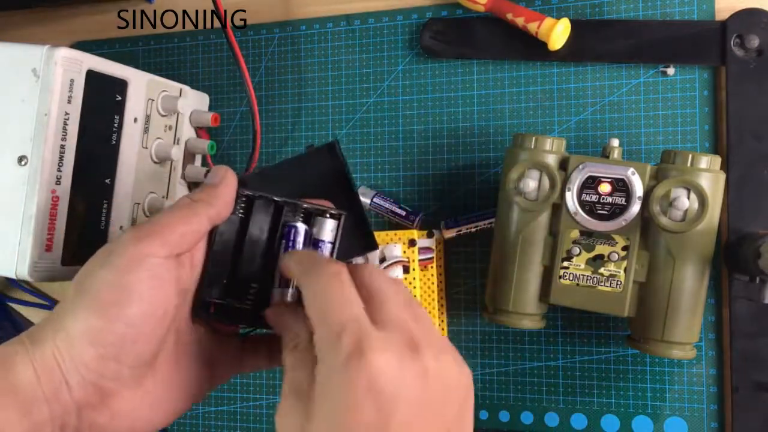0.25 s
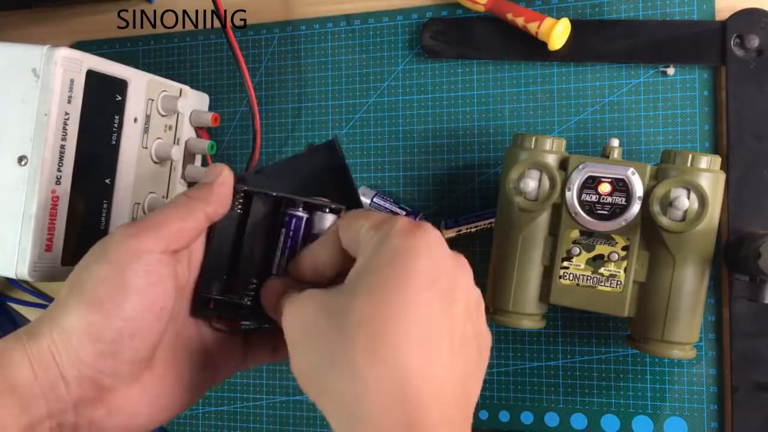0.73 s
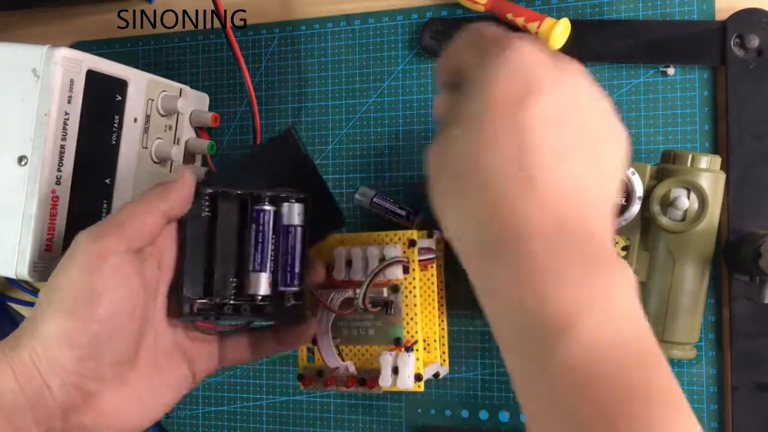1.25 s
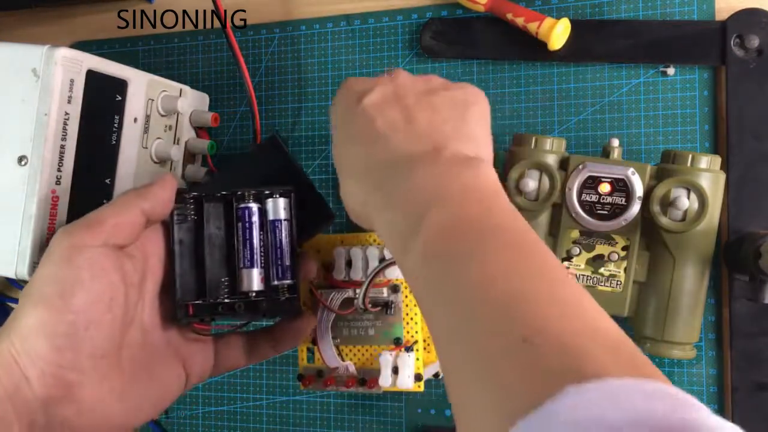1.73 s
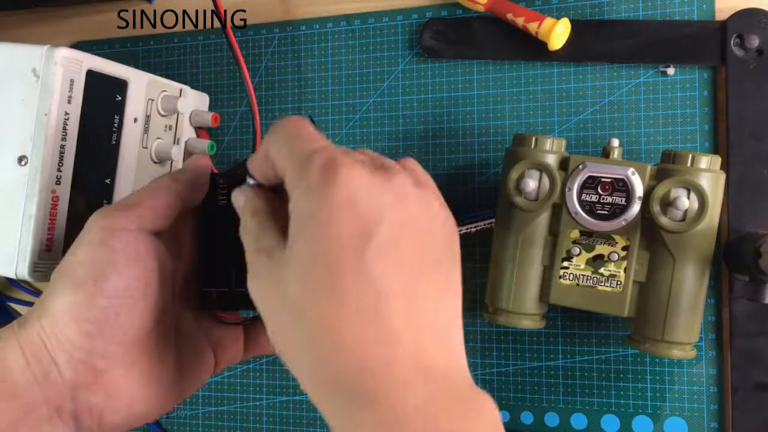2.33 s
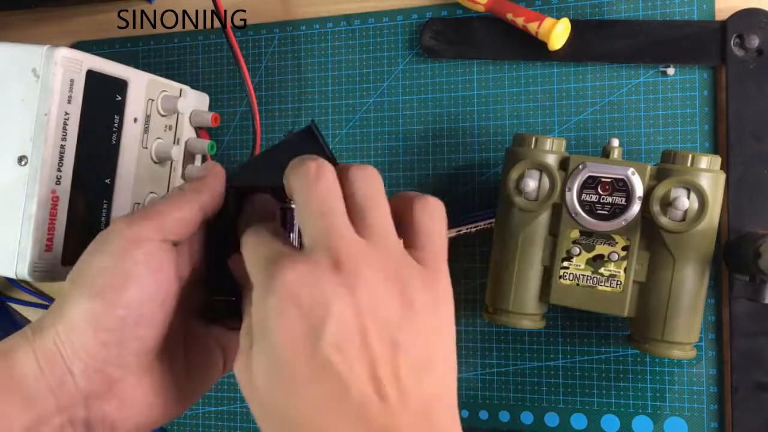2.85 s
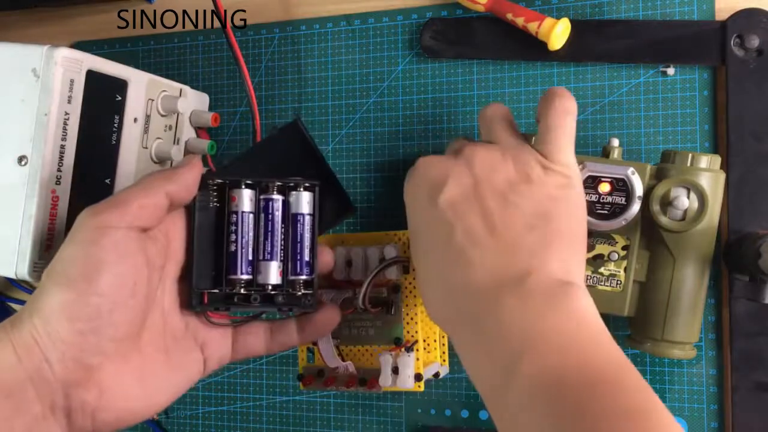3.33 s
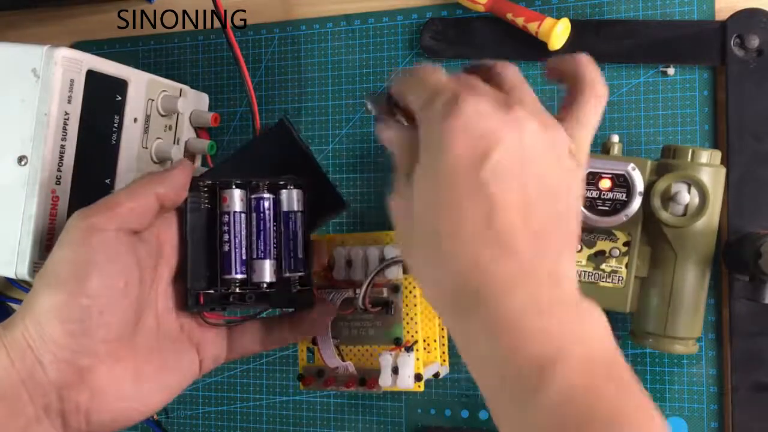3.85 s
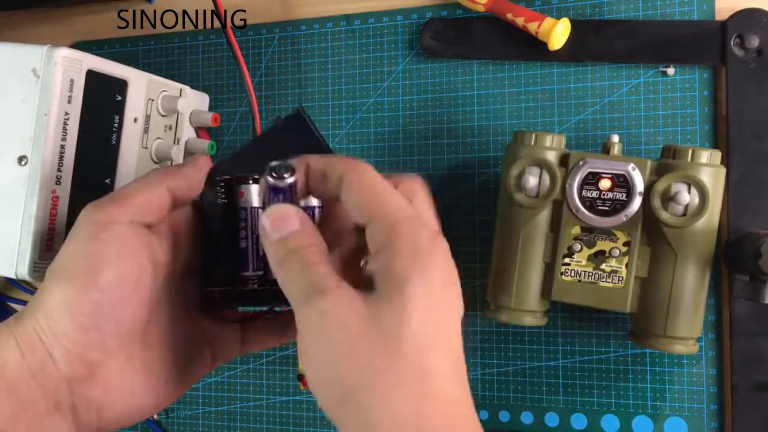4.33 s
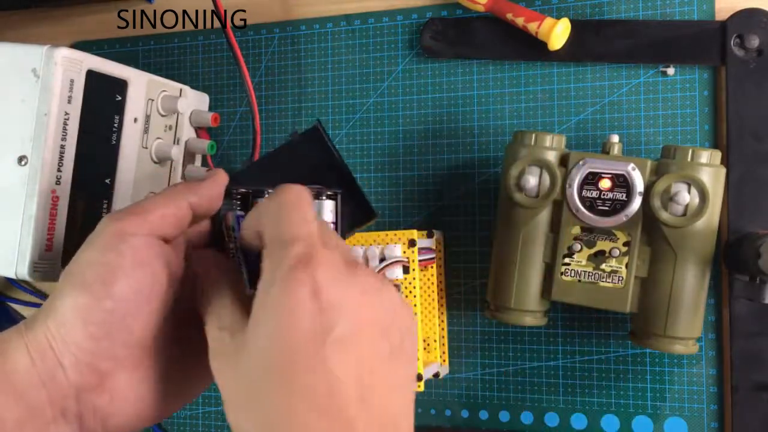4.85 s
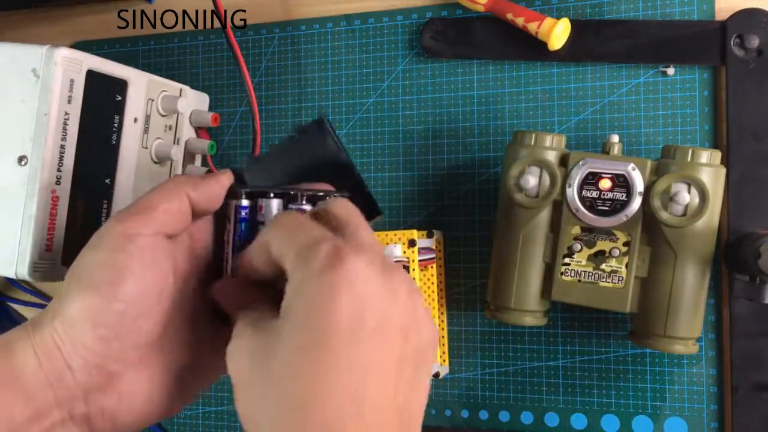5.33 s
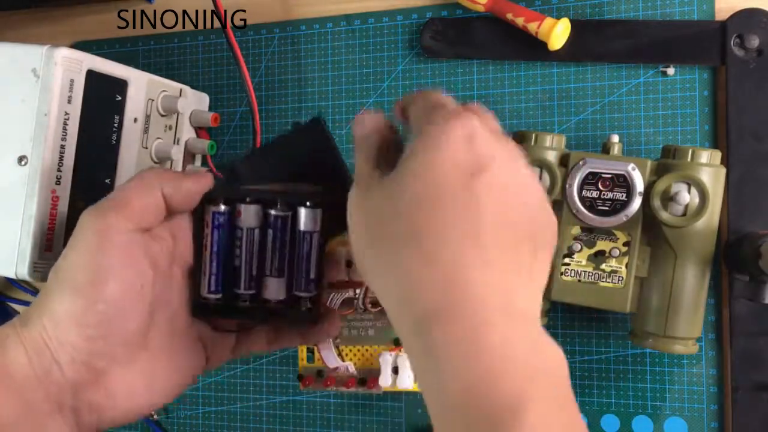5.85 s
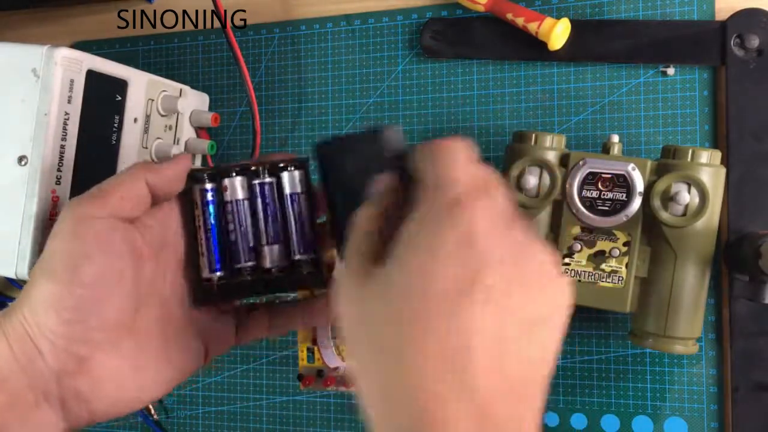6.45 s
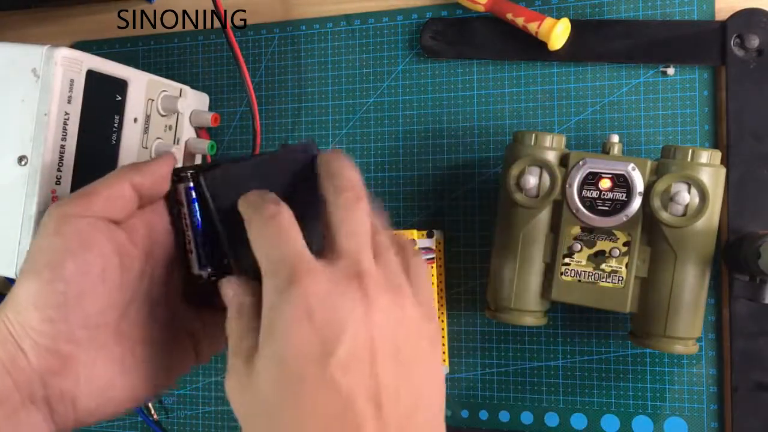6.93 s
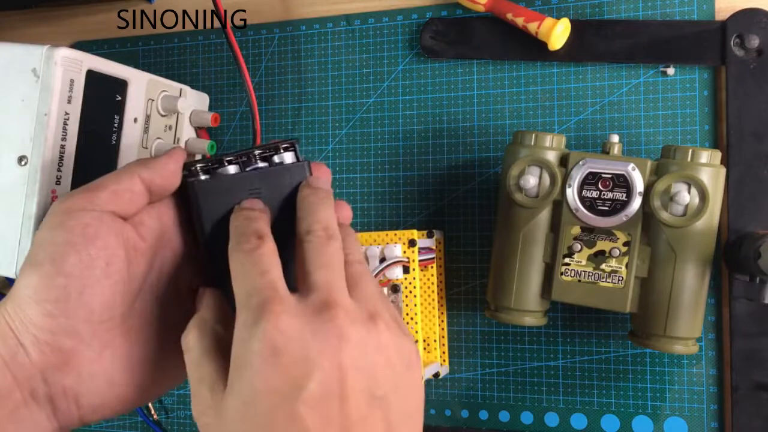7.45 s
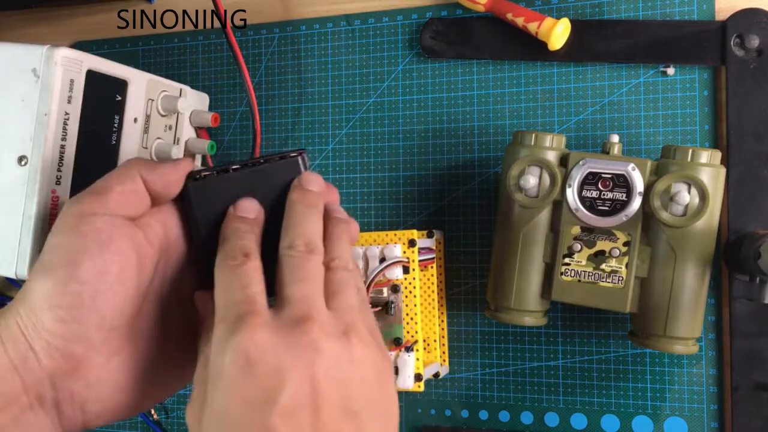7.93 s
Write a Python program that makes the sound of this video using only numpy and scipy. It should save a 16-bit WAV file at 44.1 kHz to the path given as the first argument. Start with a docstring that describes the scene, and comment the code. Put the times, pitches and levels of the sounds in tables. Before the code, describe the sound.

Small battery cells tick, scrape and snap into a hard plastic holder over a low room hum, then a thin lid slides shut.

```python
"""Close microphone over a workbench in a small room with a low hum; faint double chirps recur throughout.
First, cells tick, scrape and snap into a plastic holder, a contact spring sings and the bench is bumped.
More cells go in, a hand bumps the bench while fetching the last, and that one is pressed home.
Finally the lid is picked up, laid on and slid shut. Contacts are small forces ringing each part's modes,
the spring is a set of fluttering tones, and the background is wavering tones and filtered noise."""
import sys
import numpy as np
from scipy import signal
from scipy.fft import rfft, irfft
from scipy.io import wavfile

SR = 44100
rng = np.random.default_rng(int(sys.argv[2]) if len(sys.argv) > 2 else 0)


def wav_record(signal):
    """Record a signal, one row per channel, as 16-bit PCM in the file named by sys.argv[1]."""
    frames = np.transpose(np.atleast_2d(signal))
    bounded = np.clip(frames, -1, 1)
    # unit amplitude maps onto the largest positive 16-bit level
    quanta = np.round(bounded * 32767).astype(np.int16)
    wavfile.write(sys.argv[1], SR, quanta)


N = 361179

# Cells touching the holder, levels before colour and mix: [start_s, drag_s, favoured_hz, level_db, weight_db, hardness_db]
CELL_CONTACTS = [(.0088, 0, 2600, -29.5, -1, -4.5), (.015, 0.03, 2380, -42, 3, 1),
                 (.024, 0.014, 2120, -29, 2.5, -7), (.044, .017, 2880, -36, -5, 2),
                 (.163, .002, 2090, -41, 4, 4), (.1965, 0.0046, 2580, -29.5, 2.5, -2.5),
                 (.3596, 0.002, 2430, -34, 11.5, 15), (.4344, 0.0015, 1830, -27.5, -0.5, -7),
                 (.4653, 0.0028, 2820, -33, 11, 18.5), (.9567, 0, 2630, -62.5, 5, 26.5),
                 (2.3456, 0.0078, 2460, -43, -9, 6), (2.3715, 0.00027, 2570, -28.5, -1, -5),
                 (2.4284, 0.0018, 2160, -33.5, 0, -4), (2.4673, 0.0042, 2150, -24.5, 3, -3.5),
                 (2.4937, 0.00067, 2050, -24.5, -1.5, -16), (2.6204, 0.0029, 2070, -51, -4, 12),
                 (2.714, 0.021, 2060, -43.5, 4.5, -8), (2.805, 0.0068, 2116, -44.5, 6, 13),
                 (2.8162, .01, 2100, -25.5, -2.5, -1.5), (2.8267, .001, 2150, -12, 1, 6.5),
                 (2.8335, 0.0045, 2160, -26.5, -5.5, 4), (3.0008, 0, 2040, -43.5, -9, -4),
                 (3.042, 0.0017, 2440, -35, -10, 3.5), (4.799, 0.011, 2550, -44, -9, 9),
                 (4.8798, 0.0023, 2670, -38, 1, 3.5), (5.1748, 0, 2510, -18, -1.5, 3),
                 (5.2794, 0.00082, 2050, -23, 8, 6), (5.2882, 0.0068, 1900, -20.5, 1.5, -2),
                 (5.3066, 0.00098, 2040, -17, 5, 1), (5.321, 0.0066, 2040, -31, 5, 7)]
# The lid picked up, laid on and slid home: [start_s, drag_s, favoured_hz, level_db, weight_db, hardness_db]
LID_CONTACTS = [(5.9655, 0.0041, 2850, -36, 6, 1), (6.186, .007, 2460, -51, 9, 13),
                (6.4986, 0.0032, 1960, -38.5, 4.5, 6.5), (6.5809, 0.0061, 2190, -47, 11, -8),
                (6.595, 0.072, 2340, -55.5, 10, 1), (6.7128, 0.0027, 2400, -31, 4, 2),
                (6.7172, 0.007, 2600, -22, -5.5, 0), (6.738, 0.0097, 2350, -42, 1, 10.5),
                (7.08, 0.08, 2800, -56, 4, 1), (7.2614, 0.0015, 2170, -43.5, 1, -3),
                (7.2908, 0.0017, 2670, -36.5, 0, 3.5), (7.48, 0.018, 2210, -46, 1.5, 1.5),
                (7.5083, 0.0022, 2370, -28, -1.5, 3.5), (7.524, 0.017, 2340, -38, 2, 1.5),
                (7.7, 0.054, 2150, -50.5, 2.5, -7), (7.8605, 0, 2100, -31, -9, -2)]
# Registers of a contact, thud to tick: [low_hz, high_hz]
REGISTERS = [(280, 750), (750, 1380), (1620, 3200), (3100, 5900), (7600, 15800)]
# What one dB of weight adds to each register, thud to tick: [lift_db_per_db]
WEIGHT_LIFTS = [1.05, .95, 0, 0, 0]
# What one dB of hardness adds to each register, thud to tick: [lift_db_per_db]
HARDNESS_LIFTS = [0, 0, 0, .65, 1.05]
# An average holder contact, relative level in each register, thud to tick: [level_db]
HOLDER_COLOUR = [-17.5, -12.5, -0.5, -10, -20.5]
# An average lid contact, relative level in each register, thud to tick: [level_db]
LID_COLOUR = [-13.5, -6, 0, -4.5, -19]
# Modes of the loaded holder, before favouring: [pitch_hz, level_db, t60_s]
HOLDER_MODES = [(430, -29, .016), (645, -5.5, 0.047), (860, -2.5, 0.0066), (1086, 5, 0.018),
                (1176, -22.5, 0.0083), (1813, -6, 0.0195), (1961, 1, 0.025), (2116, -5, 0.039),
                (2318, -5.5, 0.04), (2650, -7, 0.022), (2850, 9.5, 0.0055), (3220, -10.5, 0.051),
                (3704, 5.5, 0.0135), (4070, 7.5, 0.0065), (4500, 1, 0.016), (5480, -3.5, 0.02),
                (6630, -13.5, 0.0051), (9000, -4, 0.019), (9340, -4, .01), (11220, -7.5, 0.018),
                (13850, -32, .008)]
# Lingering tones of the holder: [pitch_hz, level_db, t60_s]
HOLDER_RING = [(1885, -33.5, .2), (2060, -37, .22), (2250, -19, 0.36), (2380, -31.5, 0.18)]
# Modes of the thin lid, before favouring: [pitch_hz, level_db, t60_s]
LID_MODES = [(620, -22, .022), (880, -9, 0.014), (1046, -1, 0.03), (1140, -2, 0.012), (1670, -11, .014),
             (1830, -8, .014), (1970, -6, .018), (2150, -3, .018), (2325, -1, 0.013), (2620, -1.5, .018),
             (2895, -2.5, 0.014), (3600, -1, 0.011), (4020, -1, 0.0087), (5300, -13, .012),
             (9450, -8, 0.013)]
# Stereo spread of a contact, before the spread gain; widest for loud ticks: [tick_db, spread_db]
STEREO_SPREAD = [(-72, -33.5), (-53.5, -20.5), (-32, -2.5)]
# Fingers working the parts into place: [start_s, end_s]
FUMBLING = [(.1, .15), (0.479, .55), (2.501, 2.8), (4.81, 4.86), (5.19, 5.26), (5.56, 5.62), (6.02, 6.06),
            (7.6, 7.7)]
# Contact spring let go: [start_s, level_db]
SPRING_PLUCKS = [(.009, -52), (0.198, -55.5), (0.464, -59.5), (.6, -59.5)]
# Paired bending modes of the coil: [pitch_hz, level_db, t60_s]
SPRING_MODES = [(2299, 1, 0.87), (2360, -2.5, 1.24), (2800, -1, 1.3), (2848, -4.5, 1.1), (3230, -5, 1.4),
                (3280, -4, 1.2), (3730, -5, 0.42), (4300, -9, 0.3)]
# Soft bumps on the bench: [start_s, thump_db, rattle_db]
BUMPS = [(.778, -40, -66), (0.815, -43.5, -77), (3.452, -38, -48), (3.647, -33.5, -42), (3.742, -48, -50),
         (3.818, -30, -37.5)]
# Modes of the bench top: [pitch_hz, level_db, t60_s]
BENCH_MODES = [(92.6, 0, 0.44), (121, -10, 0.17), (215, -3, 0.092), (243.4, -2.5, 0.08), (343, -1.5, 0.046)]
# Modes of the loose things lying on the bench: [pitch_hz, level_db, t60_s]
RATTLE_MODES = [(605, -2.5, 0.051), (963, -1, 0.059), (1172, 2.5, 0.062), (1385, -8.5, 0.068),
                (1643, -4, 0.1), (1895, -1.5, 0.038), (2184, -6, 0.019)]
# Reflections off nearby surfaces: [delay_s, level_db]
ECHOES = [(.0023, -24), (.0068, -17.5), (0.0123, -23.5)]
# Diffuse room tail, gains before band filtering: [pitch_hz, level_db, t60_s]
ROOM = [(247, -15.5, 0.19), (1000, -14.5, 0.31), (2185, -12.5, 0.27), (4500, -12.5, 0.27),
        (9000, -5.5, 0.13), (14940, -15.5, .25)]
# Room hum, rms levels and the share of the tone that wanders: [pitch_hz, level_db, waver_0_to_1]
HUM = [(30.6, -57.5, .9), (69.2, -48, 0.99), (84, -55.5, .25), (100.3, -61, 0.91), (124, -60.5, 0.37)]
# Spectrum shape of the room air, relative: [pitch_hz, level_db]
AIR = [(59, -26), (100, -0.5), (156, -2), (260, -4.5), (302, -7), (335, -5.5), (415, -11.5), (608, -9),
       (705, -12.5), (1390, -14), (4980, -32.5), (7450, -35), (10700, -44.5), (14100, -46), (16000, -54)]
# Faint high double chirps: [start_s]
CHIRPS = [.16, 1.185, 1.955, 2.61, 3.715, 4.515, 5.4, 6.375, 7.535]

AIR_DB = -53  # rms
CUTOFF_HZ = 16000
# After each contact the part rebounds and rubs to rest, much weaker
REBOUND_S, REBOUND_DRAG_S, REBOUND_DB = .012, .0095, -28
# Faint touches while the fingers work; the rate is rounded to whole touches, at least one per spell
TOUCHES_PER_S, TOUCH_DRAG_S, TOUCH_HZ, TOUCH_DB, TOUCH_SPREAD_DB = 11, .026, 2310, -53, 1.5


def from_db(db):
    """Decibels to gain."""
    return 10 ** (np.asarray(db) / 20)


def rms(x):
    """Root mean square."""
    return np.sqrt(np.mean(np.abs(x) ** 2) + 1e-24)


def seconds(length):
    """A time axis of the given length in seconds."""
    return np.arange(int(length * SR)) / SR


def fade(t, t60):
    """Exponential decay, 60 dB down at t60."""
    return np.exp(-np.log(1000) * t / t60)


def band(x, low, high, order=2):
    """Causal band-pass."""
    sos = signal.butter(order, [low, min(high, .48 * SR)], "band", fs=SR, output="sos")
    return signal.sosfilt(sos, x)


def add(out, start_s, sound):
    """Mix a sound in from start_s."""
    at = max(int(start_s * SR), 0)
    out[at:at + len(sound)] += sound[:N - at]


def struck(modes, t, vary_db):
    """Decaying sines; each blow lands elsewhere and so weighs them differently."""
    hz, db, t60 = np.array(modes).T[:, :, None]
    polarity = rng.choice([-1, 1], hz.shape)
    weight = from_db(db + vary_db * rng.standard_normal(hz.shape)) * polarity
    return np.sum(weight * np.sin(2 * np.pi * hz * t) * fade(t, t60), axis=0)


def contacts(table, colour, modes, lingering, snap_db, crack_db, crack_t60, crack_hz,
             vary_db, slips_per_s, slip_db, favour_db, favour_octaves):
    """Each contact force drives a snap, a brief crack and the part's modes, levelled by register.
    Returns the sound and a copy scaled for stereo spread."""
    out, for_spread, t = np.zeros(N), np.zeros(N), seconds(.22)
    hz, mode_db, t60 = np.transpose(modes)
    dull = signal.butter(1, min(crack_hz, .45 * SR), fs=SR, output="sos")
    for start_s, drag_s, favoured_hz, level_db, weight_db, hardness_db in table:
        levels = register_levels(colour, level_db, weight_db, hardness_db)
        spread_db = np.interp(levels[-1], *np.transpose(STEREO_SPREAD))

        # the point of contact favours the modes around one pitch
        octaves_away = np.log2(hz / favoured_hz)
        favour = favour_db * np.exp(-(octaves_away / favour_octaves) ** 2)
        body = struck(np.transpose([hz, mode_db + favour, t60]), t, vary_db)
        crack = from_db(crack_db) * rng.standard_normal(len(t)) * fade(t, crack_t60)
        crack[0] += from_db(snap_db)  # the sudden stop of the part radiates one sharp pulse
        body += signal.sosfilt(dull, crack)
        if lingering:
            body += struck(lingering, t, vary_db)

        first = contact_force(drag_s, slips_per_s, slip_db)
        rebound = contact_force(REBOUND_DRAG_S, slips_per_s, slip_db)
        sound = signal.fftconvolve(body, with_rebound(first, rebound))[:len(t)]

        # each register is levelled over the drag and a few milliseconds more
        attack = int((max(drag_s, 0) + .0065) * SR)
        hit = np.zeros(len(t))
        for db, (low, high) in zip(levels, REGISTERS):
            part = band(sound, low, high, order=3)
            hit += from_db(db) * part / rms(part[:attack])
        add(out, start_s, hit)
        add(for_spread, start_s, from_db(spread_db) * hit)
    return out, for_spread


def register_levels(colour, db, weight_db, hardness_db):
    """Weight behind a contact fills its low registers, a hard edge its high ones."""
    weight = weight_db * np.array(WEIGHT_LIFTS)
    hardness = hardness_db * np.array(HARDNESS_LIFTS)
    return db + np.array(colour) + weight + hardness


def contact_force(drag_s, slips_per_s, slip_db, uneven_db=2.5):
    """A first touch, then tiny slips of uneven size that die out as the drag ends."""
    t = seconds(.1)
    polarity = rng.choice([-1, 1], len(t))
    sizes = from_db(slip_db + uneven_db * rng.standard_normal(len(t))) * polarity
    slips = (rng.random(len(t)) < slips_per_s / SR) * sizes
    # full for three quarters of the drag, gone a quarter after it
    force = slips * np.clip(2 * (1 - t / max(drag_s, 1e-5)) + .5, 0, 1)
    force[0] = 1
    return force


def with_rebound(first, rebound):
    """The force of a contact, followed by that of its weaker rebound."""
    late = np.pad(rebound, (int(REBOUND_S * SR), 0))[:len(first)]
    return first + from_db(REBOUND_DB) * late


def faint_touches():
    """Light rubs of average weight and hardness, at uneven moments while the fingers work."""
    touches = []
    for start, end in FUMBLING:
        count = max(round((end - start) * TOUCHES_PER_S), 1)
        edges = np.linspace(start, end, count + 1)
        for early, late in zip(edges, edges[1:]):
            start_s = rng.uniform(early, late)
            level_db = TOUCH_DB + TOUCH_SPREAD_DB * rng.standard_normal()
            touches.append((start_s, TOUCH_DRAG_S, TOUCH_HZ, level_db, 0, 0))
    return touches


def spring(flutter_db, flutter_per_s):
    """The coil sings on after a cell slips past it, fluttering as it chafes against the cell."""
    out, t = np.zeros(N), seconds(1.5)
    for start_s, level_db in SPRING_PLUCKS:
        for mode in SPRING_MODES:
            knots = rng.standard_normal(size=200)
            wander = np.interp(t * flutter_per_s, np.arange(len(knots)), knots)
            tone = from_db(flutter_db * wander) * struck([mode], t, vary_db=.5)
            add(out, start_s, from_db(level_db) * tone)
    return out


def bench(grit_db, grit_t60, thud_db, thud_t60):
    """A soft bump thuds and booms in the bench top and shakes what lies on it."""
    out, t = np.zeros(N), seconds(.5)
    for start_s, thump_db, rattle_db in BUMPS:
        grit = from_db(grit_db) * band(rng.standard_normal(len(t)), 390, 2600) * fade(t, grit_t60)
        thud = from_db(thud_db) * band(rng.standard_normal(len(t)), 56, 266) * fade(t, thud_t60)
        boom = struck(BENCH_MODES, t, vary_db=.1)
        rattle = struck(RATTLE_MODES, t, vary_db=3.5)
        add(out, start_s, from_db(thump_db) * (boom + thud))
        add(out, start_s, from_db(rattle_db) * (rattle + grit))
    return out


def stereo_spread(x, level_db, bass_db, t60, above_hz):
    """A short, mostly treble noise response spreads the contacts, with opposite polarity towards each side."""
    t = seconds(.06)
    noise = rng.standard_normal(len(t)) * fade(t, t60)
    noise /= np.linalg.norm(noise)
    treble = from_db(level_db) * band(noise, above_hz, CUTOFF_HZ, order=4)
    side = signal.fftconvolve(x, treble + from_db(bass_db) * noise)[:N]
    return side * [[1], [-1]]


def room(x, build_up_s, wide_hz, width):
    """Close echoes and a short diffuse tail; the two ears differ mainly in the treble."""
    t, (at_hz, db, t60) = seconds(.5), np.transpose(ROOM)
    edges = np.geomspace(125, 16000, 15)
    response = np.zeros((2, len(t)))
    for low, high in zip(edges, edges[1:]):
        hz = np.sqrt(low * high)
        shape = fade(t, np.interp(hz, at_hz, t60)) * (1 - np.exp(-t / build_up_s))
        tail = rng.standard_normal((2, len(t))) * shape / np.linalg.norm(shape)
        mid, side = band(tail, low, high)
        spread = width * hz ** 4 / (hz ** 4 + wide_hz ** 4)
        response += from_db(np.interp(hz, at_hz, db)) * (mid + spread * side * [[1], [-1]])
    for delay_s, echo_db in ECHOES:
        response[:, int(delay_s * SR)] += from_db(echo_db)
    return x + signal.fftconvolve(x[None], response, axes=1)[:, :N]


def hiss(handling, level_db, full_at_db, follows, hold_s, t60):
    """A thin hiss swells with each bright click, sags, and stops a moment later."""
    ticks = band(handling, 10000, CUTOFF_HZ) ** 2
    memory = fade(seconds(hold_s), t60) ** 2  # squared, since it weighs power
    recent = np.sqrt(np.abs(signal.fftconvolve(ticks, memory)[:N]) / SR)
    swell = np.tanh((recent / from_db(full_at_db)) ** follows)
    noise = band(rng.standard_normal(N), 2500, 10000, order=1)
    return from_db(level_db) * swell * noise / rms(noise)


def hum(waver_hz):
    """Low machine tones whose strength and phase wander."""
    t, out = np.arange(N) / SR, np.zeros(N)
    knots = np.arange(0, N / SR + 1, .01)
    smooth = signal.butter(2, waver_hz, fs=100, output="sos")
    for hz, level_db, waver in HUM:
        slow = signal.sosfilt(smooth, [1, 1j] @ rng.standard_normal((2, len(knots))))
        wander = np.interp(t + 1, knots, slow / rms(slow))  # skips the filter's first second
        share = np.clip(waver, 0, 1)
        strength = np.sqrt(1 - share ** 2) + share * wander
        tone = np.real(strength * np.exp(2j * np.pi * hz * t))
        out += from_db(level_db) * tone / rms(tone)
    return out


def air(rumble_db):
    """Steady ventilation noise, shaped in frequency, over a rumble."""
    hz = np.maximum(np.fft.rfftfreq(N, 1 / SR), 1)
    at_hz, db = np.transpose(AIR)
    shape = from_db(np.interp(np.log(hz), np.log(at_hz), db))
    steady = irfft(rfft(rng.standard_normal(N)) * shape, N)
    rumble = band(rng.standard_normal(N), 22, 120)
    return from_db(AIR_DB) * steady / rms(steady) + from_db(rumble_db) * rumble / rms(rumble)


def chirps(pitch_hz, width_hz, low_db, octave_db, gap_s, peak_s):
    """Pairs of faint rasping chirps: gated noise in a narrow band and its octave."""
    gate, t = np.zeros(N), seconds(.15)
    pulse = (t / peak_s) ** 2 * np.exp(2 * (1 - t / peak_s))
    for start_s in CHIRPS:
        add(gate, start_s, pulse)
        add(gate, start_s + gap_s, pulse)
    low = band(rng.standard_normal(N), pitch_hz - width_hz, pitch_hz + width_hz)
    octave = band(rng.standard_normal(N), 2 * pitch_hz - width_hz, 2 * pitch_hz + width_hz)
    return gate * (from_db(low_db) * low / rms(low) + from_db(octave_db) * octave / rms(octave))


def scene():
    """Close handling noises in the room, over its hum."""
    cells, cells_for_spread = contacts(
        CELL_CONTACTS + faint_touches(), HOLDER_COLOUR, HOLDER_MODES, HOLDER_RING,
        snap_db=32.5, crack_db=9.5, crack_t60=.025, crack_hz=5000, vary_db=.7,
        slips_per_s=4000, slip_db=-8.5, favour_db=11.5, favour_octaves=.26)
    lid, lid_for_spread = contacts(
        LID_CONTACTS, LID_COLOUR, LID_MODES, None,
        snap_db=23.5, crack_db=8, crack_t60=.017, crack_hz=5100, vary_db=2,
        slips_per_s=2200, slip_db=-2.5, favour_db=7.5, favour_octaves=.15)
    handling = from_db(-1) * cells + from_db(-.44) * lid
    handling += spring(flutter_db=5, flutter_per_s=35.6)
    handling += bench(grit_db=3, grit_t60=.12, thud_db=11.5, thud_t60=.26)
    spread = stereo_spread(cells_for_spread + lid_for_spread,
                           level_db=-.5, bass_db=-18.5, t60=.033, above_hz=4800)

    background = hiss(handling, level_db=-62, full_at_db=-56.5, follows=.73, hold_s=.4, t60=2.17)
    background += hum(waver_hz=2.75) + air(rumble_db=-56)
    background += chirps(pitch_hz=7200, width_hz=350, low_db=-72, octave_db=-69, gap_s=.097, peak_s=.016)
    return room(handling, build_up_s=.00349, wide_hz=4510, width=.052) + spread + background


def record(dry):
    """The top is cut steeply."""
    return signal.sosfilt(signal.ellip(10, .2, 80, CUTOFF_HZ, fs=SR, output="sos"), dry)


dry = scene()
out = record(dry)
wav_record(out)
```